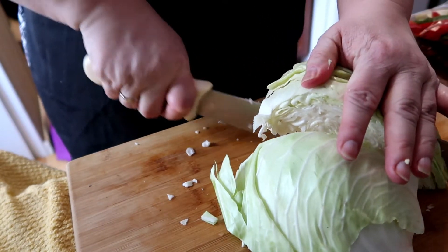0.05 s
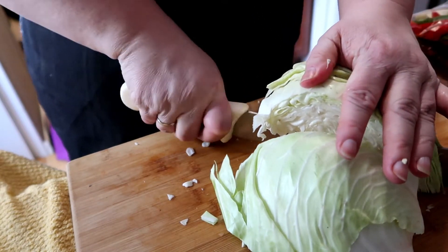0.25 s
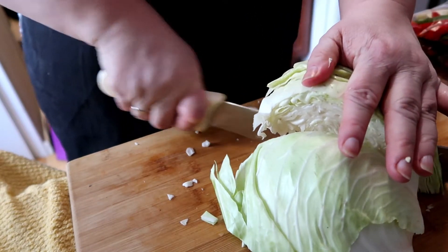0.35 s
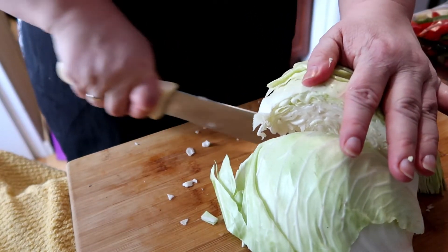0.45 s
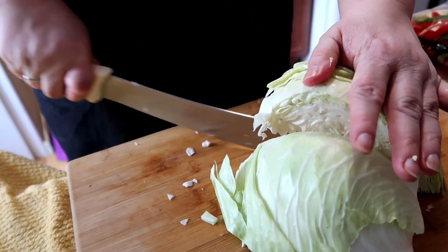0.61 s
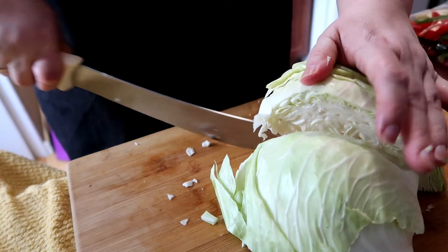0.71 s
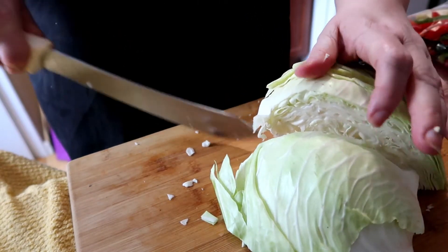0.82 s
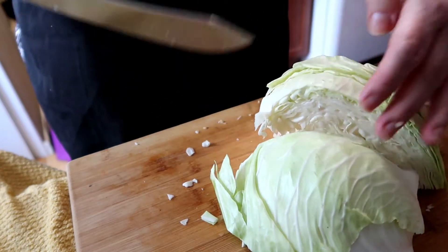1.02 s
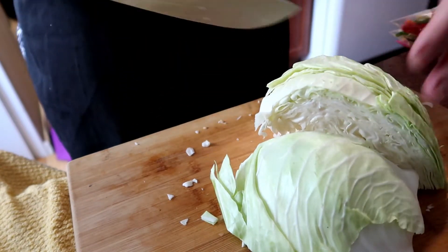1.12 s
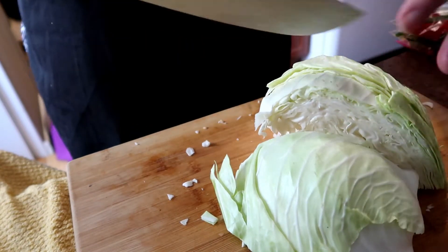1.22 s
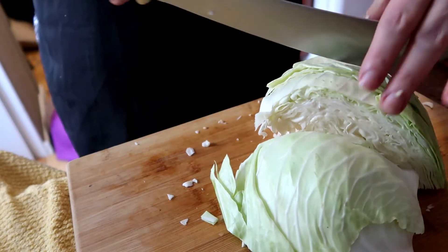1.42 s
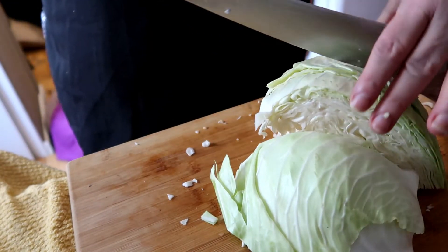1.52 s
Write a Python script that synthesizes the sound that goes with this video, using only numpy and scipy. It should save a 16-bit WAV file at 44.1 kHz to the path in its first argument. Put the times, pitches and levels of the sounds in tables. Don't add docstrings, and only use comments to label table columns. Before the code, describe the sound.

One cabbage cut heard close on a phone microphone: brief leafy crunch with a low board groan, a hard wooden knock with a slight steel edge, then faint scraping and ticking over fridge hum.

```python
import sys
import numpy as np
from scipy import signal
from scipy.io import wavfile

SR = 44100
rng = np.random.default_rng(int(sys.argv[2]) if len(sys.argv) > 2 else 0)


def makeup_ratio(level_db):
    decades = np.asarray(level_db, float) / 20
    return 10 ** decades


def to_wav(sig):
    pcm = np.clip(np.atleast_2d(sig), -1, 1) * 32767
    pcm = np.round(pcm).astype(np.int16)
    wavfile.write(sys.argv[1], SR, pcm.T)


N = 68355

# start_s, strength_db, contact_ms
KNOCKS = [
    (.2099, -0.5, 0.21),
    (.2132, -14, 0.44),
    (0.2324, -23.5, 0.36),
    (0.2438, -34.5, 0.26),
    (0.3735, -19.5, 3.3),
]
# pitch_hz, likeness (1 = same in both)
NEAR_LIKENESS = [(300, 1), (2000, 1), (5000, 0.69), (12000, 0.82)]


def rms_one(x):
    return x / np.sqrt(np.mean(x ** 2) + 1e-20)


def filtered(x, order, hz, kind):
    return signal.sosfilt(signal.butter(order, hz, kind, fs=SR, output="sos"), x)


def in_time(rows):
    s, *columns = np.transpose(rows)
    t = np.arange(N) / SR
    fade_in = np.clip((t - s[0]) / 0.0072 + 1, 0, 1)
    fade_out = np.clip((s[-1] - t) / 0.0063 + 1, 0, 1)
    return [fade_in * fade_out] + [np.interp(t, s, c) for c in columns]


def at_hz(points, hz):
    table_hz, values = np.array(points).T
    return np.interp(np.log(hz), np.log(table_hz), values)


def drift(rate_hz):
    r = np.exp(-80 * np.pi * rate_hz / SR)
    white = rng.standard_normal(N // 40 + 2002)
    slow = signal.lfilter([1], [1, -2 * r, r * r], white)[2000:]
    return np.interp(np.arange(N) / 40, np.arange(len(slow)), rms_one(slow))


def ring(clicks, hz, t60_s):
    r, w = makeup_ratio(-60 / (t60_s * SR)), 2 * np.pi * hz / SR
    return signal.lfilter([0, np.sin(w)], [1, -2 * r * np.cos(w), r * r], clicks + 1e-18)


def resonant(x, hz, width_hz):
    return rms_one(ring(x, hz, np.log(1000) / np.pi / width_hz))


def grains(per_s, spread_db):
    sizes = makeup_ratio(spread_db * np.minimum(rng.exponential(1, (2, 2, N)), 5))
    sizes = sizes * rng.choice([-1, 1], (2, 2, N))
    return rms_one(sizes * (rng.random((2, 2, N)) < per_s / SR))


def banded(white, spectrum, likeness, patchy_db):
    out, together = 0, drift(8)
    edges = 22 * 2 ** np.arange(0, 9.6, .5)
    for k, (low, high) in enumerate(zip(edges, edges[1:])):
        hz = np.sqrt(low * high)
        if hz > spectrum[0][0] * .8:
            mid, side = filtered(white[k % 2], 2, [low, high], "band")
            alike = np.clip(at_hz(likeness, hz), -1, 1)
            gain = makeup_ratio(at_hz(spectrum, hz) + patchy_db * (together + drift(7.9)))
            out = out + gain * (np.sqrt(1 + alike) * mid + np.sqrt(1 - alike) * side * [[1], [-1]])
    return rms_one(out)


def cutting():
    # start_s, level_db
    shear = [
        (0.0, -52),
        (0.034, -39.5),
        (0.132, -36.5),
        (0.192, -33.5),
        (0.207, -27.5),
        (0.212, -74),
        (0.25, -50),
        (0.292, -53),
        (0.315, -59),
    ]
    # pitch_hz, level_db
    crunch_spectrum = [(180, -21), (300, -1.5), (408, -35.5), (664, 4.5), (861, -0.5), (2820, -5),
                       (4500, -12.5), (10100, -23), (14500, -19.5)]
    # pitch_hz, width_hz, level_db
    shaken = [(665, 59, -6.5), (767, 28, -9.5), (934, 44, -21.5), (1500, 55, -17.5), (2156, 28, -15.5),
              (2380, 120, -14), (2720, 130, -9.5), (12300, 790, -33)]
    # start_s, level_db
    push = [
        (0.0, -28.5),
        (0.022, -42),
        (0.1, -27),
        (0.176, -30.5),
        (0.196, -21),
        (0.208, -28),
    ]
    # pitch_hz, and width_hz
    push_hz = [108, 210]
    push_width_hz = [38, 40]

    gate, db = in_time(shear)
    snaps = grains(per_s=9000, spread_db=2)
    tones = sum(makeup_ratio(level_db) * resonant(snaps[k % 2, 0], hz, width)
                for k, (hz, width, level_db) in enumerate(shaken))
    crunch = gate * makeup_ratio(db) * (banded(snaps, crunch_spectrum, NEAR_LIKENESS, patchy_db=1.03) + tones)

    bright = filtered(crunch, 2, 3170, "high")
    speeding_s = np.clip(np.arange(N) / SR - .08, 0, .11)
    crunch = crunch + bright * (makeup_ratio(19 * speeding_s) - 1)

    gate, db = in_time(push)
    groan = sum(resonant(rng.standard_normal(N), hz, width) for hz, width in zip(push_hz, push_width_hz))
    return crunch + gate * makeup_ratio(db - 9.5) * groan


def knocks():
    # pitch_hz, level_db, t60_s
    board_modes = [(111.5, -41, 0.29), (186.6, -6, 0.051), (307, -15, 0.052), (476.5, -13.5, 0.083),
                   (693, -2.5, 0.057), (792, 1, 0.038), (950, -44, 0.14), (1320, -1, 0.029),
                   (1414, -31.5, 0.21), (1532, 3.5, 0.017), (1969, -24, 0.048), (2088, -7, 0.022),
                   (2820, -42, 0.025)]
    # pitch_hz, level_db, t60_s
    blade_modes = [(3890, 0, 0.0036), (4350, 1, 0.0084), (5070, -14, 0.0083), (7030, -16, 0.0041)]
    # start_s, level_db
    cracks = [
        (0.2113, -17.5),
        (0.212, -19),
        (0.2137, -29),
    ]
    # pitch_hz, level_db
    tail_spectrum = [(59, -19), (100, 15.5), (360, -9), (750, 9), (994, 9.5), (1370, 15.5), (1750, -5.5),
                     (4000, -35)]
    # pitch_hz, width_hz, level_db
    strand_modes = [(650, 44, -14), (825, 40, -1.5), (1277, 50, -9), (1390, 67, -7), (1550, 59, -12.5)]
    node_hz = 1100
    tail_db, tail_rise_s, tail_t60_s = -21, 0.0037, 0.2

    t, blow = np.arange(N) / SR, np.zeros(N)
    for s, db, ms in KNOCKS:
        shape = np.exp(-.5 * ((t - s) / (ms / 3000)) ** 2)
        blow += makeup_ratio(db) * shape / shape.sum()
    body = sum(np.sign(node_hz - hz) * makeup_ratio(db) * ring(blow, hz, t60) for hz, db, t60 in board_modes)

    white = rng.standard_normal((2, 2, N))
    clicks = np.zeros(N)
    for s, db in cracks:
        clicks[int(s * SR)] = makeup_ratio(db)
    clicks = filtered(clicks + 1e-18, 4, 6600, "low")
    crack = sum((-1) ** k * makeup_ratio(db) * ring(clicks, hz, t60) for k, (hz, db, t60) in enumerate(blade_modes))

    since = np.maximum(t - KNOCKS[0][0], 0)
    strands = sum(makeup_ratio(db) * resonant(white[1, 0], hz, width) for hz, width, db in strand_modes)
    tail = banded(white, tail_spectrum, NEAR_LIKENESS, patchy_db=2.5) + strands
    tail = tail * makeup_ratio(2.3 * drift(130.0))
    tail = tail * (1 - np.exp(-since / tail_rise_s)) * makeup_ratio(tail_db - 60 * since / tail_t60_s)

    board = body + filtered(tail, 6, 2250, "low")
    board = filtered(board, 4, 89, "high")
    return board + makeup_ratio([[-2.5], [1.5]]) * crack


def scrape():
    # start_s, level_db, brightness_db
    draw = [(0.35, -63.5, 8), (0.375, -52, 1), (0.442, -43, -3), (0.52, -41, -2), (0.614, -39.5, -5),
            (0.708, -47, 2), (0.818, -45, 5), (0.845, -54, 9.5), (0.945, -60.5, 11), (0.97, -65.5, 11.5),
            (1.11, -64.5, 9.5), (1.3, -65, 5.5)]
    # pitch_hz, width_hz, level_db, share of brightness
    drag = [(674, 8, -3.5, -1.5), (790, 43, -3, -1.03), (1162, 26, -5.5, 0.7), (1286, 65, 0.5, -0.31),
            (1428, 24, -4, 0.31), (1539, 81, 0.5, -0.0029), (2093, 60, -8.5, 0.2), (2400, 145, -4, 0.43),
            (3310, 490, -15, 0.95), (5070, 230, -18.5, 1)]
    # pitch_hz, level_db
    rasp_spectrum = [(240, -48), (400, -24), (657, -3.5), (1030, -27), (1250, -35), (1740, -7.5),
                     (14500, -31)]
    # its low and high limit, pitch_hz
    hiss_hz = [11500, 14300]

    gate, db, bright_db = in_time(draw)
    grit = grains(per_s=3000, spread_db=3.0)
    tones = 0
    for k, (hz, width, level_db, share) in enumerate(drag):
        gain = makeup_ratio(level_db + share * bright_db + 2.9 * drift(8.8))
        tones = tones + gain * resonant(grit[k % 2, k // 2 % 2], hz, width)
    rasp = makeup_ratio(-10 + 1.27 * bright_db) * banded(grit, rasp_spectrum, NEAR_LIKENESS, patchy_db=0.0)
    hiss = makeup_ratio(-29 + 1.1 * bright_db) * rms_one(filtered(grit[1], 3, hiss_hz, "band"))
    return gate * makeup_ratio(db) * (makeup_ratio(-8.0) * tones + rasp + hiss)


def leaves():
    # start_s, peak_db, pitch_hz, ring_cycles
    ticks = [(0.3641, -46, 1080, 3.9), (0.4955, -40, 950, 5.6), (0.4965, -41, 2480, 19),
             (0.7465, -45, 1250, 9.0), (0.7608, -40, 2300, 5.0), (0.8131, -40, 1165, 20),
             (0.826, -48, 1160, 6.8), (0.8687, -42, 2060, 9.2), (0.8865, -45, 2400, 7.0),
             (0.897, -51, 2110, 5.1), (0.919, -54, 2300, 6.0), (0.938, -43, 2070, 4.7),
             (0.9778, -54, 1550, 12), (1.0464, -52, 2000, 6.4), (1.1078, -44, 1980, 3.5),
             (1.2494, -49, 2500, 3.8)]
    gain_db, gap_s = 9.5, 0.000906
    softness = 1.5

    out, chance = np.zeros(N), rng.random((len(ticks), 10))
    for (s, db, hz, cycles), c in zip(ticks, chance):
        times_s = s + np.cumsum(c[:5]) * gap_s
        clicks = np.zeros(N)
        clicks[(times_s * SR).astype(int)] = makeup_ratio(db + gain_db - 4.6 * c[5:] - 4.1 * np.arange(5))
        clicks = filtered(clicks + 1e-18, 2, [hz / softness, hz * softness], "band")
        out += ring(clicks, hz, cycles / hz) + 0.26 * ring(clicks, 1.44 * hz, cycles / hz)
    return out


def kitchen():
    # pitch_hz, level_db
    air_spectrum = [(15, -44), (25, -7.5), (170, -9.5), (199, -20.5), (228, -7.5), (260, -14.5),
                    (735, -20.5), (9730, -49), (14500, -62)]
    # pitch_hz, likeness
    room_likeness = [(100, 1), (500, 0.81), (2000, 0.52), (5000, 0.33), (12000, 0.12)]
    # pitch_hz, width_hz, level_db
    drone_modes = [(62.4, 3.7, -56.5), (170.7, 3.2, -44), (230.4, 15.5, -49), (334, 36, -63)]
    duck_db, recover_s = -12, 0.38

    air = makeup_ratio(-45.5) * banded(rng.standard_normal((2, 2, N)), air_spectrum, room_likeness, patchy_db=0.04)
    drone = sum(makeup_ratio(db) * resonant(rng.standard_normal(N), hz, width) for hz, width, db in drone_modes)
    since = np.arange(N) / SR - KNOCKS[0][0]
    ducking = (since > 0) * np.exp(-np.maximum(since, 0) / recover_s)
    return (air + drone) * makeup_ratio(duck_db * ducking)


def scene():
    left_lag_us, left_db = 42, -0.5
    near = cutting() + knocks() + scrape() + leaves()
    late = np.interp(np.arange(N) - left_lag_us * 1e-6 * SR, np.arange(N), near[0])
    return np.array([late * makeup_ratio(left_db / 2), near[1] * makeup_ratio(-left_db / 2)]) + kitchen()


def top_cut(x):
    return signal.sosfilt(signal.butter(12, 14850, fs=SR, output="sos"), x)


def record(dry):
    ceiling, knee = 0.99, 5.0
    rounded = dry / (1 + np.abs(dry / ceiling) ** knee) ** (1 / knee)
    mix = signal.sosfilt(signal.cheby2(10, 60, 14900, fs=SR, output="sos"), rounded)
    return top_cut(mix)


dry = scene()
out = record(dry)
to_wav(out)
```